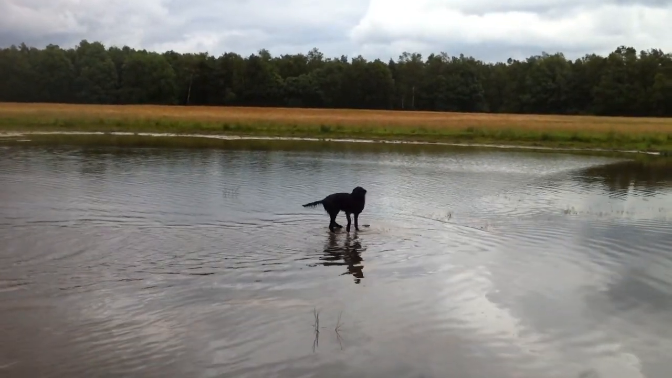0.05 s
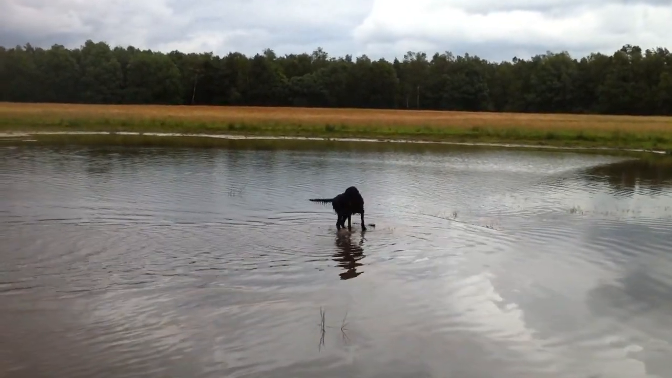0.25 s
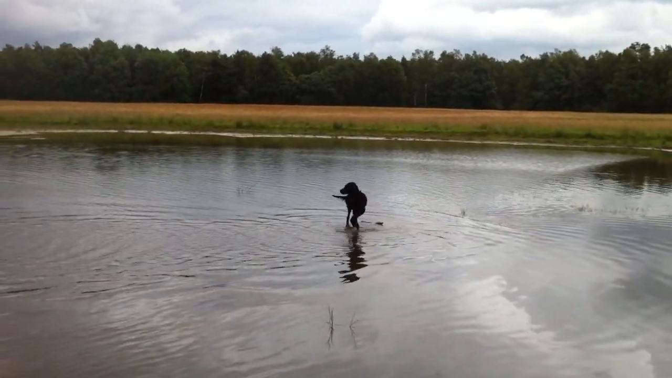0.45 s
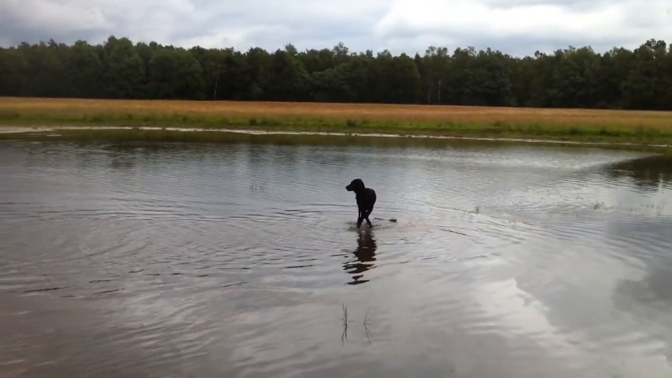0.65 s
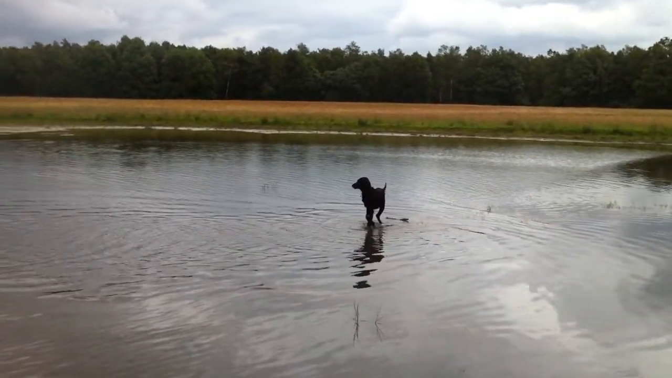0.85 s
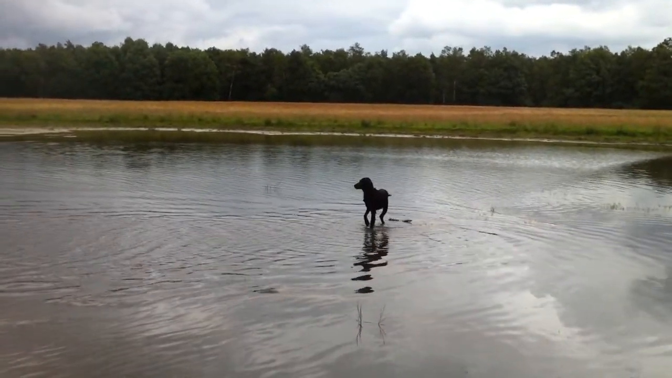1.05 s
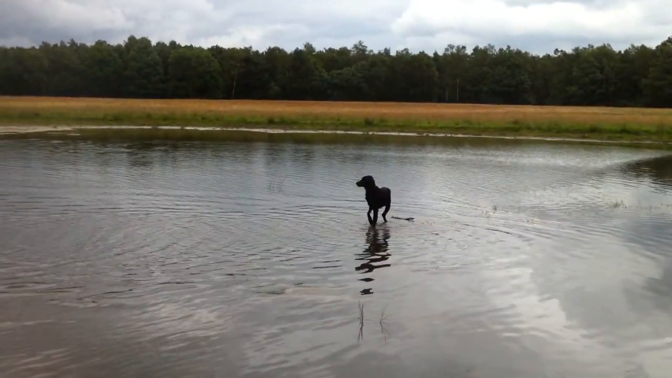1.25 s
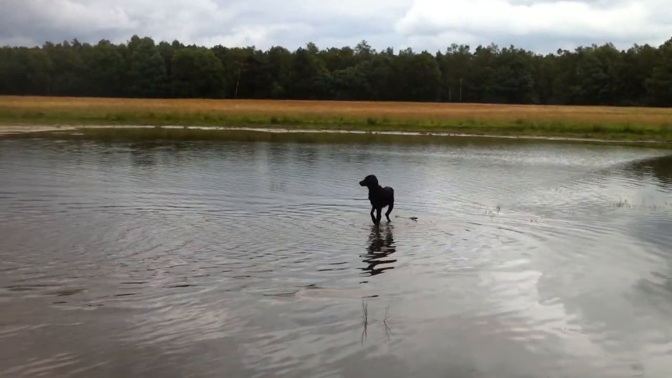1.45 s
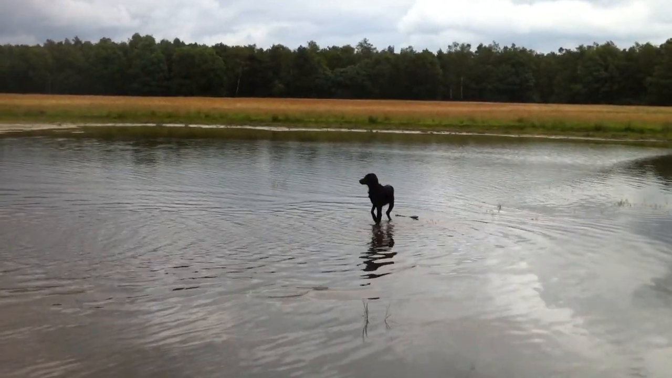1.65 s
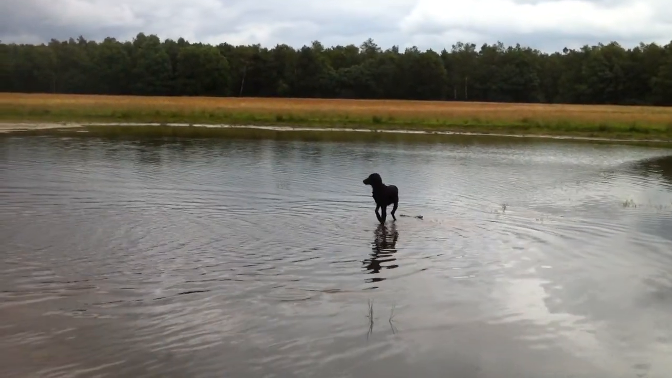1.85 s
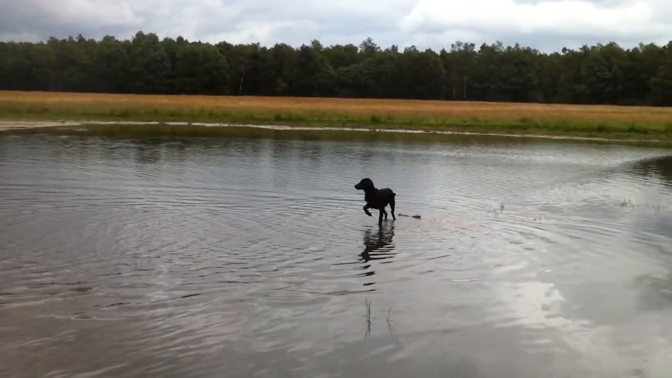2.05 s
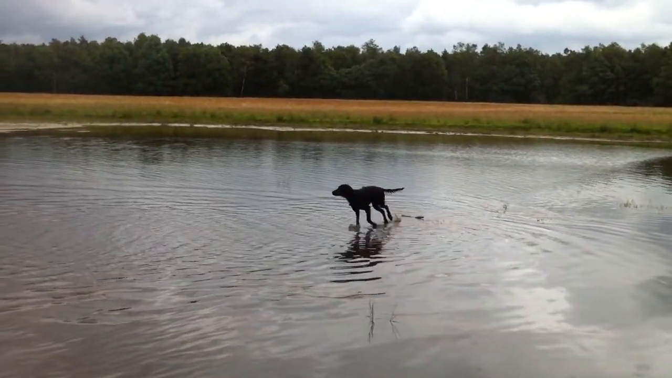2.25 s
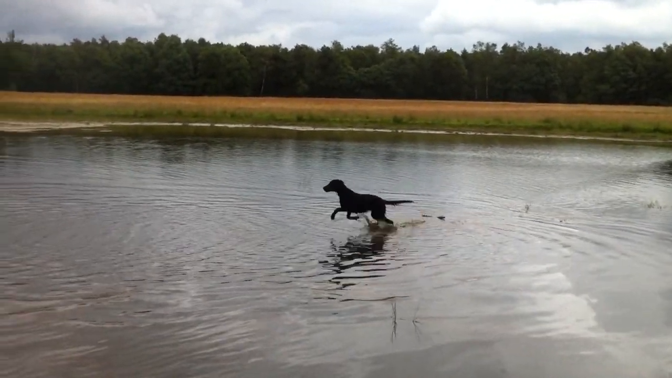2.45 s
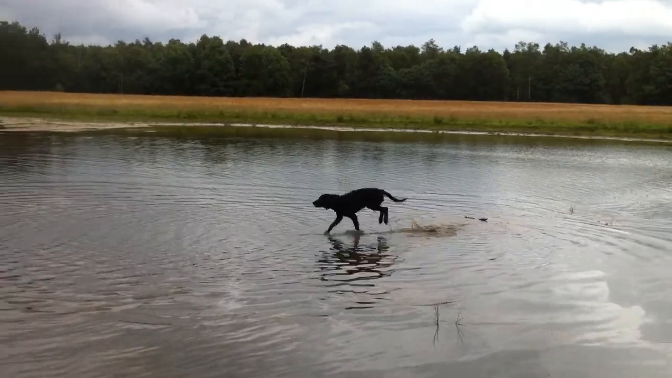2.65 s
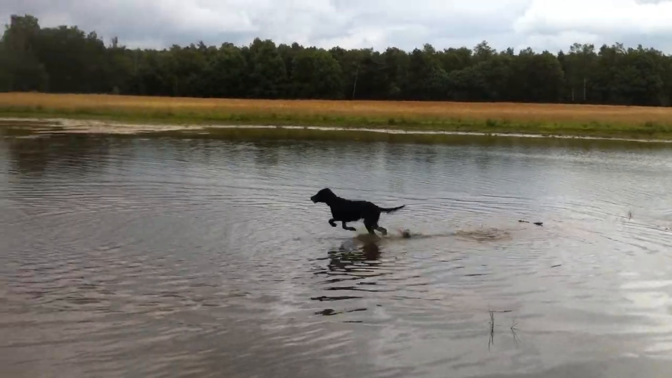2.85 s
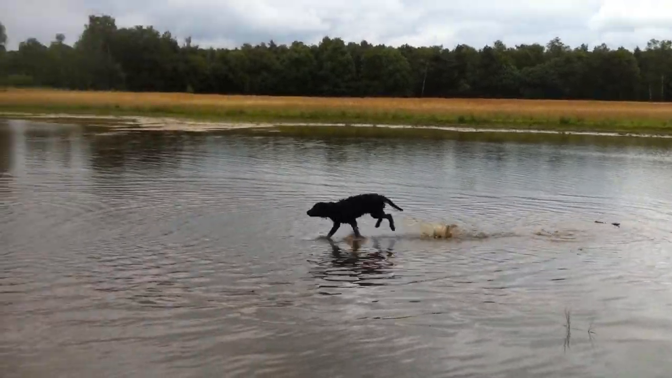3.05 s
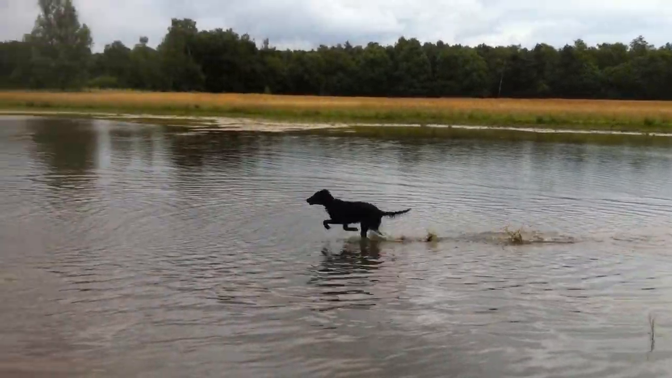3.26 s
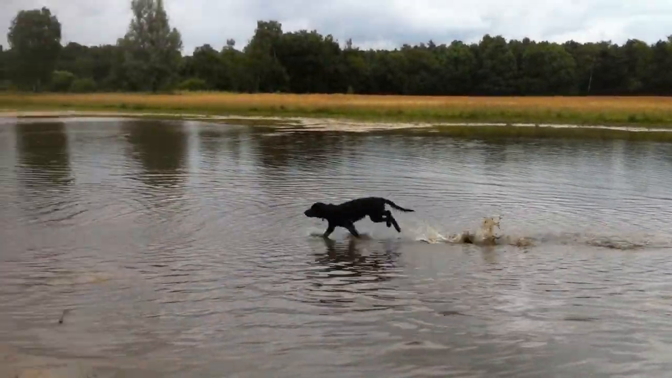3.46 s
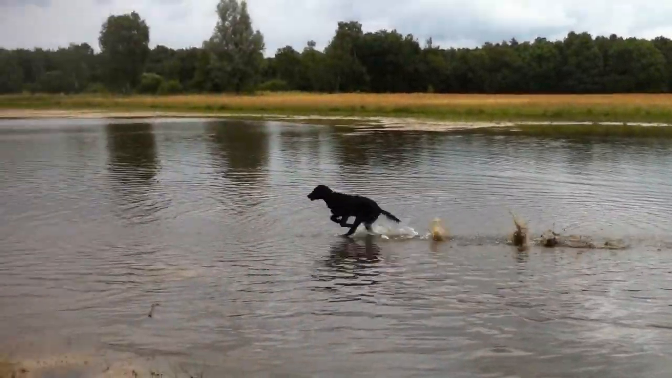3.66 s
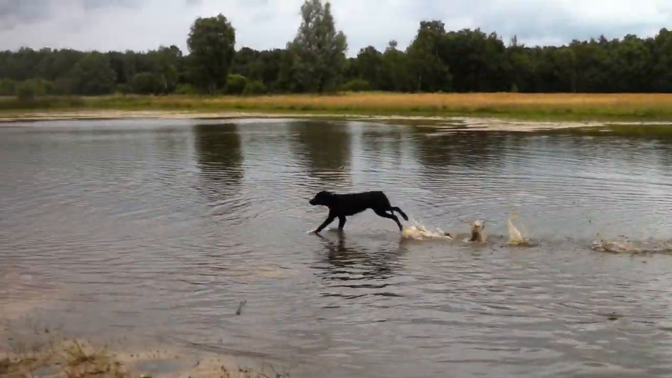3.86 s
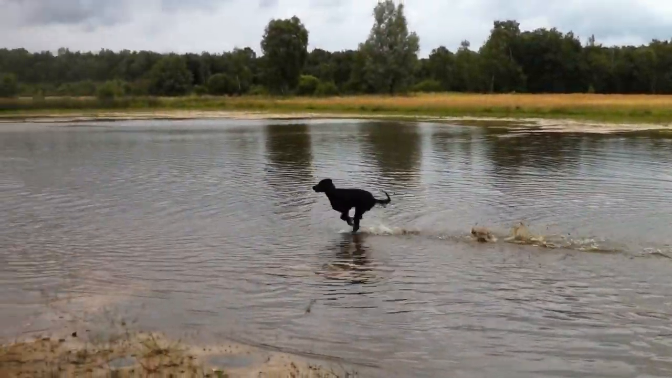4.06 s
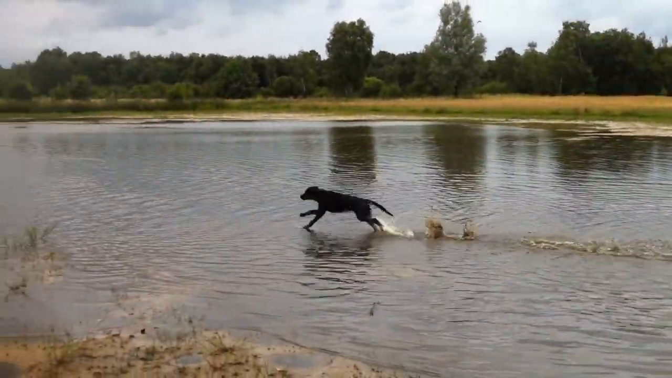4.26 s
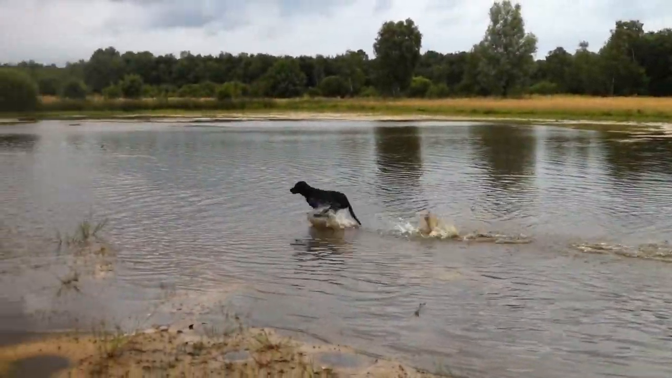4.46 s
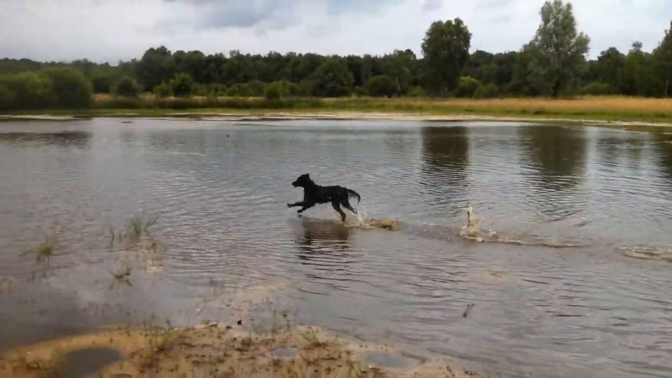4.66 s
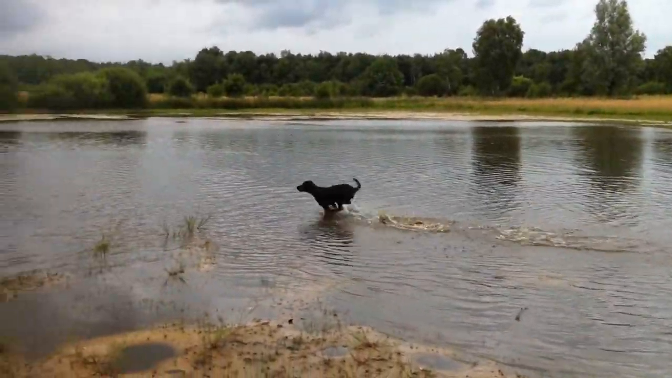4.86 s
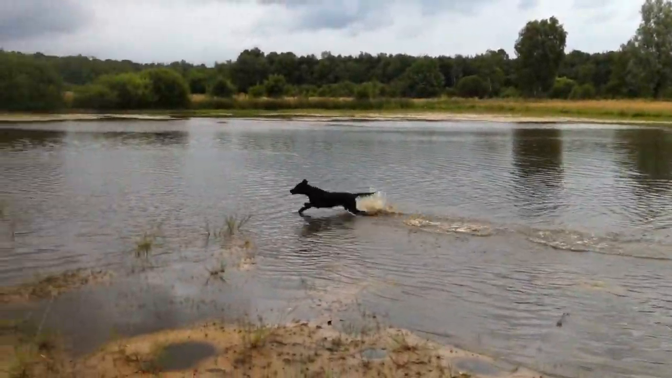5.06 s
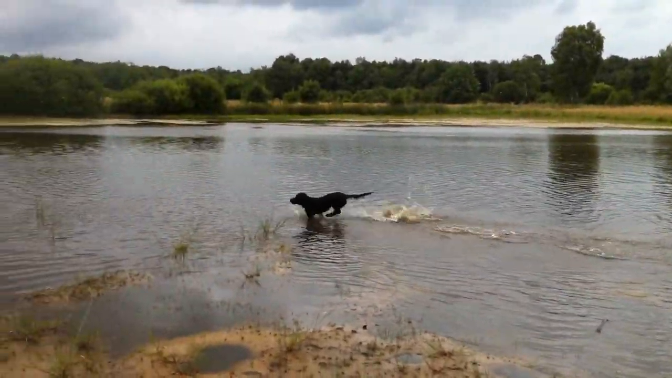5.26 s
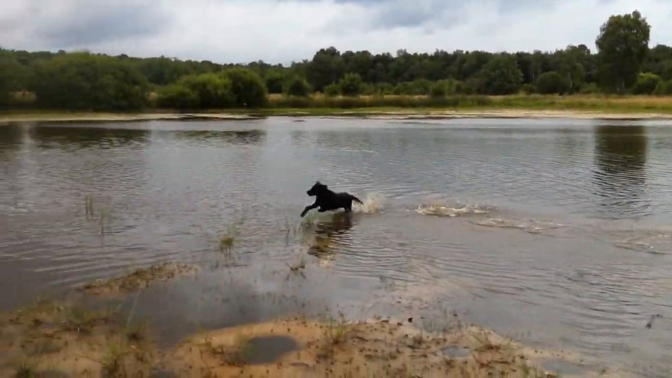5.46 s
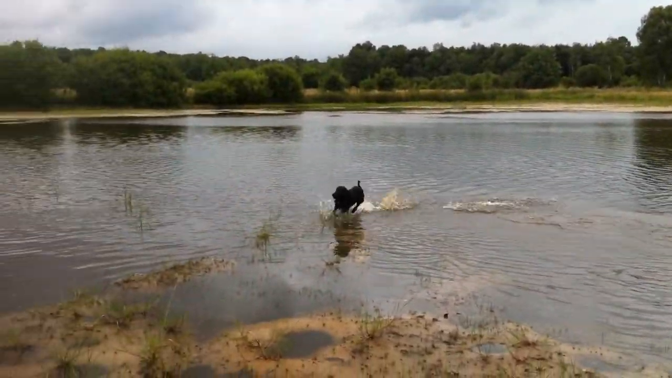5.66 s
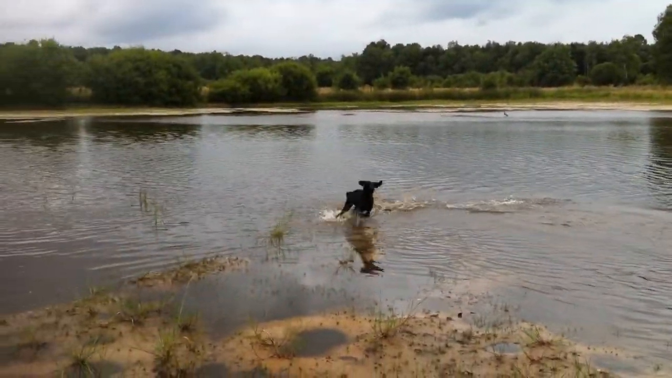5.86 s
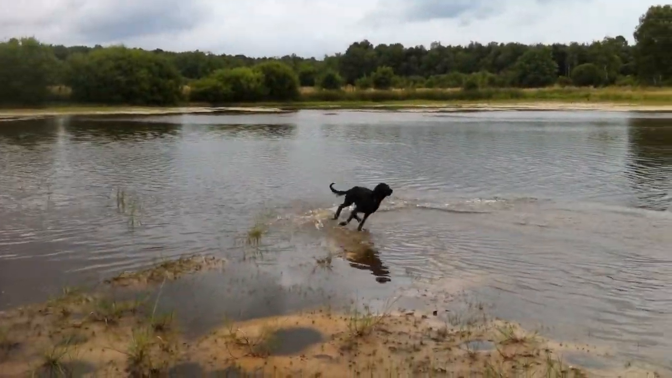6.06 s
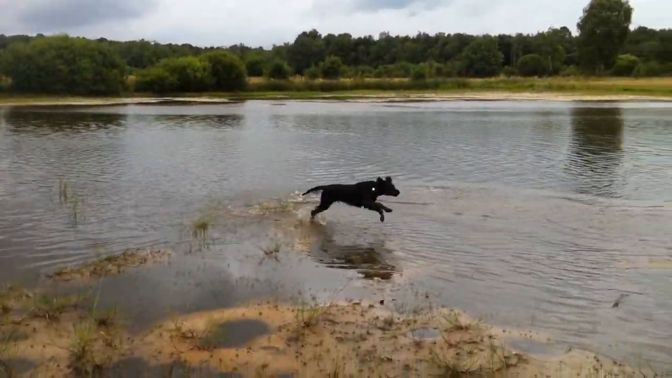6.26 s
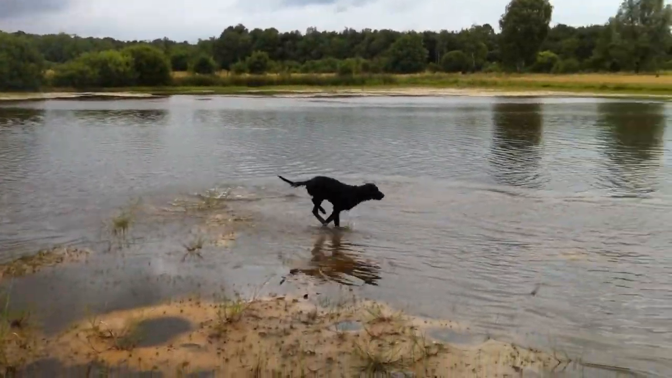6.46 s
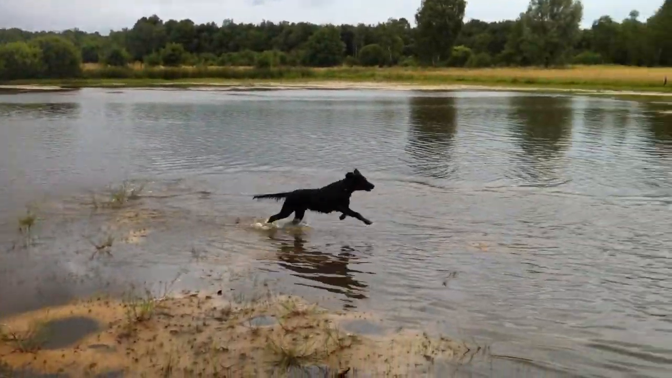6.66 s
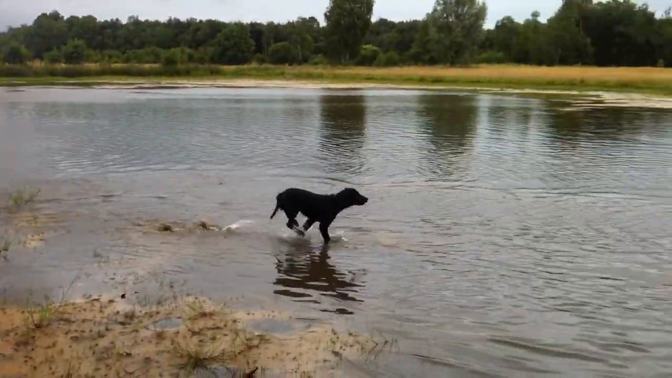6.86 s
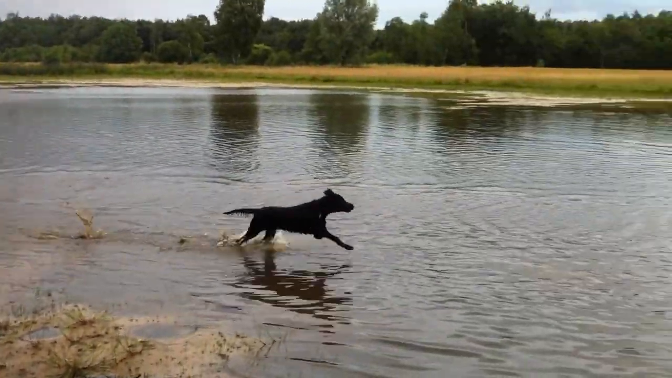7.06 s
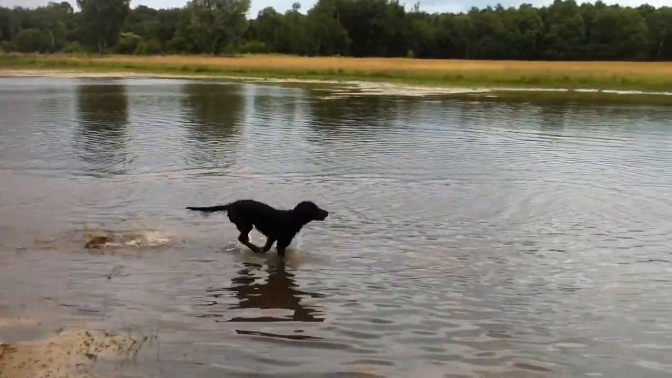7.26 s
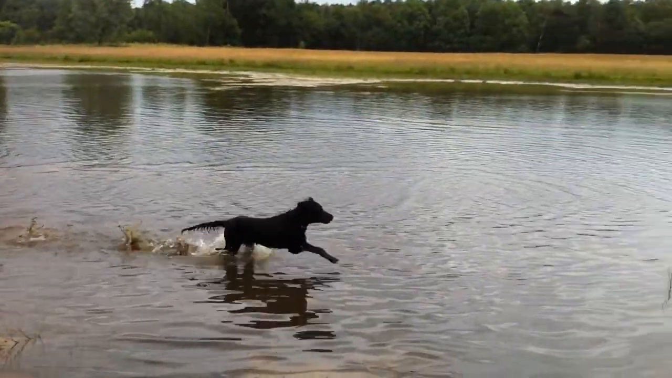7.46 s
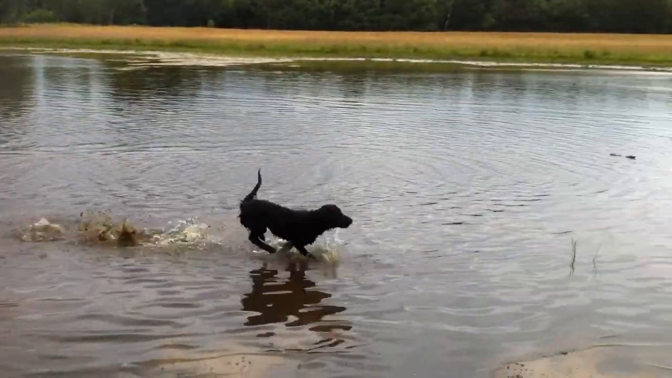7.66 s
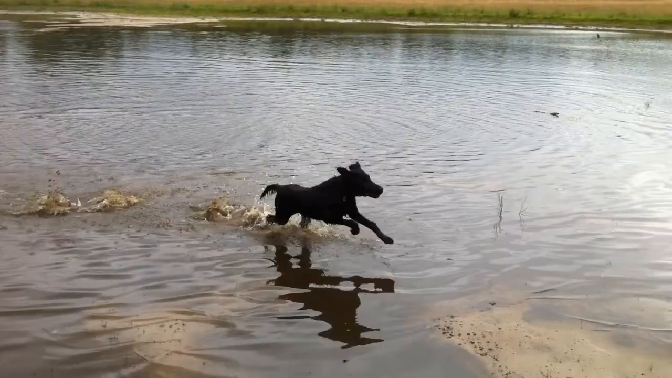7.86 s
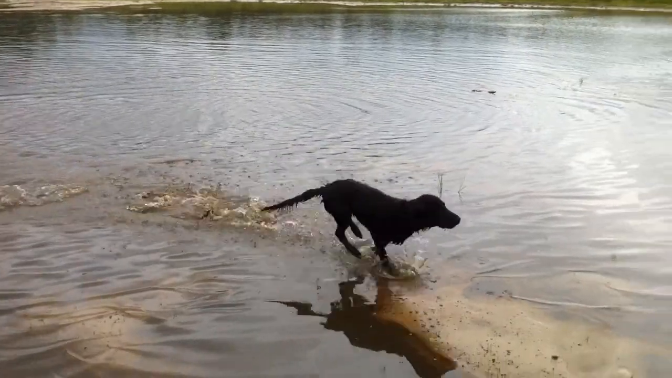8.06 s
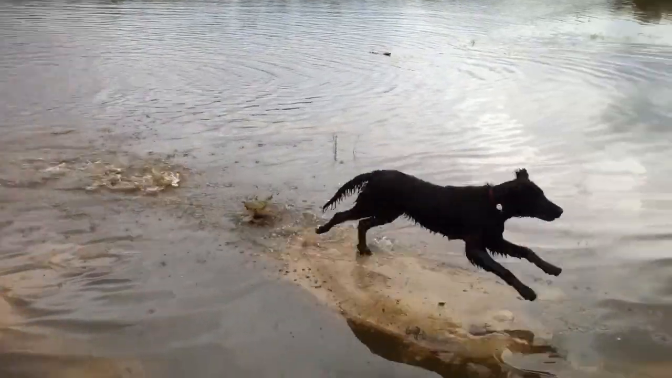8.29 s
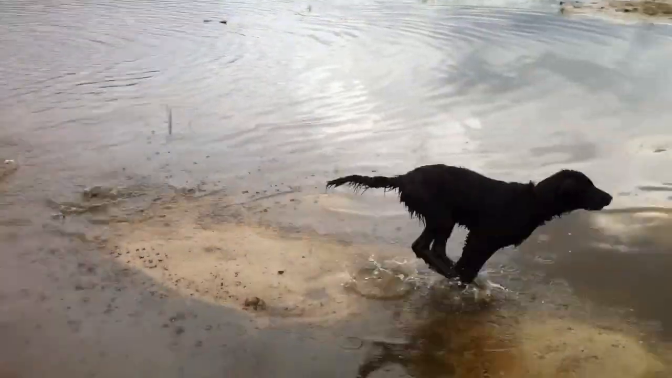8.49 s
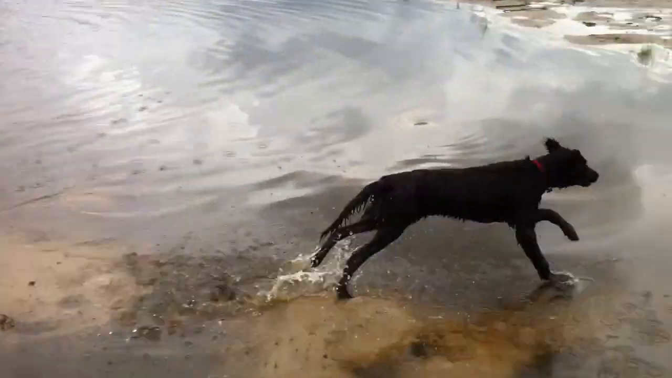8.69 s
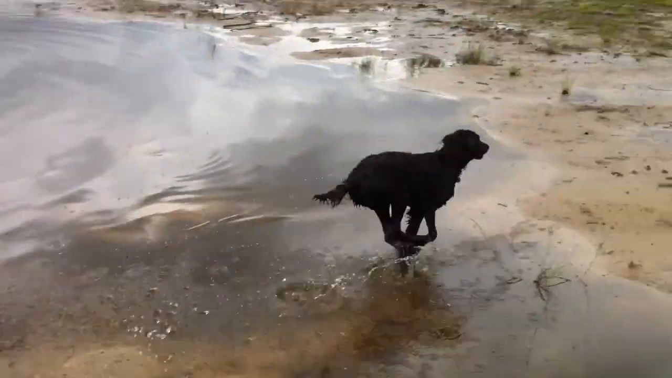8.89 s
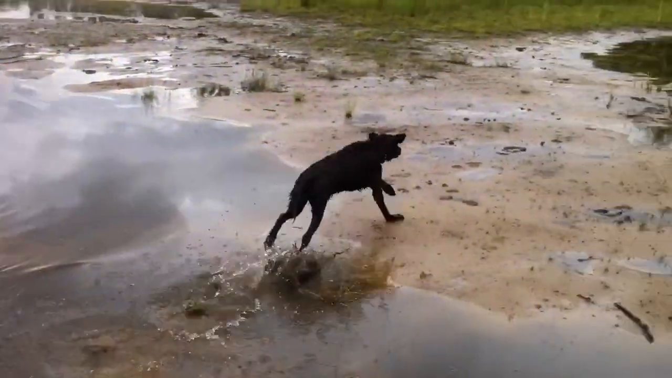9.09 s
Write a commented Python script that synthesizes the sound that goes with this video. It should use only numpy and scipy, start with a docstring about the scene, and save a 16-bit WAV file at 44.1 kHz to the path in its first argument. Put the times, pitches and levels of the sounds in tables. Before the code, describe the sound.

A dog shuffles in shallow water, pauses, then gallops splashing through the pond toward the microphone, ending loud with low wind buffeting over faint hiss.

```python
"""Over a steady hiss of trees and air, coloured noise, a dog turns in a shallow meadow pond, then stands.
It then gallops through and comes close: swarms of decaying sines bubble, and random clicks make spray.
Paws slap the surface as short noise bursts, and trapped air plops as sines that climb in pitch.
At the end wind buffets the microphone: low-pitched noise in gusts, and single pressure knocks."""
import sys
import numpy as np
from scipy import signal
from scipy.fft import rfft, irfft
from scipy.io import wavfile

SR = 44100
rng = np.random.default_rng(int(sys.argv[2]) if len(sys.argv) > 2 else 0)


def transcribe(signal):
    """Save signal, clipped to [-1, 1], as a 16-bit WAV file at the path in sys.argv[1]."""
    frames = np.atleast_2d(signal).T
    limited = np.clip(frames, -1, 1)
    pcm = np.round(limited * 32767).astype(np.int16)
    wavfile.write(sys.argv[1], SR, pcm)


N = 402633   # length in samples


def from_db(db):
    """Logarithmic level: the amplitude gain of a level in dB."""
    return 10 ** (np.asarray(db) / 20)


def rms_one(x):
    """Normalisation of power: the signal scaled to rms 1."""
    return x / np.sqrt(np.mean(x ** 2) + 1e-20)


def in_time(rows):
    """Linear interpolation: each column of a curve, sample by sample."""
    s, *columns = np.transpose(rows)
    return [np.interp(np.arange(N) / SR, s, column) for column in columns]


def at_hz(points, hz):
    """Logarithmic frequency scale: a spectrum in dB, read at these frequencies."""
    known_hz, known_db = np.array(points).T
    return np.interp(np.log(hz), np.log(known_hz), known_db)


def colour(x, spectrum, size=8192):
    """Minimum-phase filtering: the folded cepstrum gives a causal response with this spectrum."""
    hz = np.maximum(np.arange(size // 2 + 1) * SR / size, 1)
    cepstrum = irfft(np.log(from_db(at_hz(spectrum, hz))))
    cepstrum[1:size // 2] *= 2
    cepstrum[size // 2 + 1:] = 0
    response = irfft(np.exp(rfft(cepstrum)))
    return signal.fftconvolve(x, response)[:N]


SPLIT_HZ = 5200


def split(x):
    """Band division: the parts below and above the border between bubbles and spray."""
    filters = [signal.butter(4, SPLIT_HZ, kind, fs=SR, output="sos") for kind in ("low", "high")]
    return [signal.sosfilt(sos, x) for sos in filters]


def drift(rate):
    """Low-passed chance: noise through two equal poles at rate Hz, with spread 1."""
    r = np.exp(-80 * np.pi * rate / SR)   # worked out at every 40th sample
    noise = rng.standard_normal(N // 40 + 2002)
    slow = signal.lfilter([1], [1, -2 * r, r * r], noise)[2000:]
    return np.interp(np.arange(N) / 40, np.arange(len(slow)), rms_one(slow))


def place(s, grains):
    """Superposition: each row of grains is added to the time line at its second."""
    at = np.round(np.asarray(s) * SR).astype(int)[:, None] + np.arange(grains.shape[1])
    return np.bincount(at.ravel(), grains.ravel(), N + grains.shape[1] + SR)[:N]


def bubbles(s, peak_db, hz, cycles, rise, size):
    """Bubble resonance: sines swell to a peak at s and die; positive rise climbs as toward the surface."""
    swell = np.clip(cycles, .5, 12) / hz / 2.45      # the half-height width is 2.45 swell times
    age = np.arange(size) / SR / swell[:, None]
    turns = (hz * swell)[:, None] * (age + rise * (age ** 2 / 2 - age))
    shape = from_db(peak_db)[:, None] * age * np.exp(1 - age)
    return place(np.maximum(s - swell, 0), shape * np.sin(2 * np.pi * turns))


def clicks(per_s, spread_db):
    """Poisson impulses: impacts at random moments, a few bigger than the rest."""
    sizes = from_db(spread_db * np.minimum(rng.exponential(1, N), 4)) * rng.choice([-1, 1], N)
    return sizes * (rng.random(N) < per_s / SR)


# Spectrum of foliage and hiss. Each row: frequency in Hz, relative density in dB per Hz.
AIR_SPECTRUM = [(15, -88), (25, -20), (53, -22), (105, -21.5), (176, -6.5), (338, -8), (443, -10.5),
                (741, -12), (1630, -13.5), (10600, -32), (15000, -31), (16300, -29)]
AIR_DB = -61.5   # mean level


def air():
    """Stationary broadband noise: far foliage and microphone hiss, barely moving."""
    noise = colour(rng.standard_normal(N), AIR_SPECTRUM)
    return from_db(AIR_DB + 0.4 * drift(2.0)) * rms_one(noise)


def drops(per_s, hiss):
    """Shot noise: separate impacts over the blur of the many too small to count."""
    return rms_one(clicks(per_s, spread_db=1.0)) + hiss * rng.standard_normal(N)


def spatter(per_s, t60):
    """Exponential decay: a gain that jumps when a handful of drops lands and then falls away."""
    r = from_db(-60 / (t60 * SR))
    return 1.5 + 1.3 * signal.lfilter([1], [1, -r], abs(clicks(per_s, spread_db=1.0)))


THROW_RISE_S, BUBBLE_T60_S, SPRAY_T60_S = 0.02, 0.13, 0.22   # rise time constant, then 60 dB decay times


def thrown(level_db, t60):
    """Addition of powers: the gain of water each slap throws, which builds quickly and rains back."""
    power = place(np.transpose(SLAPS)[0], from_db(2 * level_db)[:, None])
    for r in np.exp(-1 / (THROW_RISE_S * SR)), from_db(-120 / (t60 * SR)):
        power = signal.lfilter([1], [1, -r], power + 1e-18)
    return np.sqrt(power / (THROW_RISE_S * SR))


FAMILY, FAMILY_S = 3, .03   # small bubbles come in families: members, span in seconds
FAMILY_PITCH_DB = 3         # whole spread of pitch in a family, as a frequency ratio in dB
SPRAY_DB, SPRAY_FOLLOWS = -2, 0.73   # spray in the throw: offset in dB, share of the slap's treble
# Water as the microphone colours it. Each row: frequency in Hz, relative density in dB per Hz.
SPLASH_SPECTRUM = [(150, -38.5), (250, -18.5), (292, -15.5), (421, -27), (607, -11.5), (1100, -13),
                   (1790, -7), (2320, -5), (4820, -18.5), (5540, -28.5), (9170, -30), (10700, -27.5),
                   (14900, -36.5), (16000, -42)]
# Water kept moving between footfalls, in two stretches: as the dog turns, then as it runs.
# Each row: time in seconds, bubbling level in dB, spray level in dB.
CHURN = [
    [(0.0, -64, -73), (0.146, -65, -74), (1.25, -74, -86)],
    [(2.3, -64.5, -80), (2.91, -59, -61.5), (3.35, -49.5, -64), (3.63, -49, -58.5), (4.81, -45, -56.5),
     (5.17, -48, -60.5), (5.84, -49.5, -58), (6.1, -52, -59), (6.31, -61, -64), (6.75, -63, -65),
     (7.03, -54.5, -100), (7.32, -49.5, -59), (8.14, -43, -52), (8.46, -49.5, -55), (8.63, -51, -52.5),
     (8.77, -49.5, -52), (9.13, -57, -56.5)],
]


def churn(count=3400):
    """Incoherent sum of many sources: swarms of small bubbles, a wash of falling drops, and fine spray."""
    bubbling_db, spray_db = in_time(sum(CHURN, []))
    born, pitch = np.repeat(rng.random((count, 2)), FAMILY, axis=0).T      # kin are close in time and size
    late, detune, loud, ring, climb = rng.random((count * FAMILY, 5)).T
    hz = 330 * from_db(24 * pitch ** .8 + FAMILY_PITCH_DB * (detune - .5))
    peak_db = at_hz(SPLASH_SPECTRUM, hz) + 4 * pitch - 2.16 * np.log(loud + 0.022)
    cycles = 1.94 + (3.2 + 8.5 * pitch) * ring ** 2
    rise = 0.09 * (climb[:, None] - .25)      # most climb in pitch, some fall
    swarm = rms_one(bubbles(born * N / SR + FAMILY_S * late, peak_db, hz, cycles, rise, size=800))

    clumps = from_db(2.0 * drift(32.0))      # drops land in bunches
    wash_drops = clumps * spatter(30, t60=0.03) * drops(1400, hiss=.5)
    wash = split(colour(wash_drops, SPLASH_SPECTRUM))[0]
    spray_drops = clumps * spatter(21, t60=0.076) * drops(790, hiss=1.5)
    spray = split(colour(spray_drops, SPLASH_SPECTRUM))[1]
    water = rms_one(swarm * from_db(2.26 * drift(51)) + 0.9 * rms_one(wash))

    t = np.arange(N) / SR
    moving = (t < CHURN[0][-1][0]) | (t > CHURN[1][0][0])      # calm water while the dog stands
    _, _, treble_db, throw_db = np.transpose(SLAPS)
    thrown_spray_db = throw_db + SPRAY_DB + SPRAY_FOLLOWS * treble_db
    bubbling = np.hypot(moving * from_db(bubbling_db), thrown(throw_db, BUBBLE_T60_S))
    spraying = np.hypot(moving * from_db(spray_db), thrown(thrown_spray_db, SPRAY_T60_S))
    return bubbling * water + spraying * rms_one(spray)


CLIMB_PER_CYCLE = 0.005   # long-ringing pockets climb further in pitch
# Each pocket sheds two others: spread of delay in seconds, level in dB, spread of pitch as a ratio in dB.
BREAKUP_S, BREAKUP_DB, BREAKUP_PITCH_DB = .012, -14, 2.5
# Larger air pockets trapped by paws and falling water, low ones deep.
# Each row: time of the peak in seconds, level in dB, pitch at the peak in Hz, length in cycles (12 at most).
POCKETS = [(0.004, -48, 1020, 5.9), (0.084, -54, 2570, 9.9), (0.186, -44, 2010, 4.5),
           (0.192, -46.5, 1620, 6.1), (0.199, -48, 1750, 8), (0.314, -52, 2220, 8), (0.449, -50, 1032, 4.2),
           (0.465, -52, 1800, 11), (0.476, -43.5, 2250, 5.9), (0.482, -45, 2250, 6.5),
           (0.722, -53, 1700, 9), (0.765, -50, 900, 4.8), (0.775, -51, 575, 4.8), (0.79, -54, 1690, 27),
           (0.813, -49, 1620, 6.3), (0.866, -50, 1430, 5.5), (0.899, -49, 810, 17), (1.073, -45, 2430, 1.9),
           (2.435, -46, 1670, 9.4), (2.443, -40, 2300, 3.7), (2.49, -50, 1400, 3.3),
           (2.563, -36.5, 1550, 7.3), (2.586, -40, 1940, 8), (2.707, -40, 1670, 11),
           (2.731, -36.5, 2480, 5.6), (2.846, -32, 2200, 1.9), (2.869, -32, 1860, 4.3),
           (2.976, -30, 1100, 2.5), (2.98, -33.5, 605, 5.5), (3.134, -33, 3380, 7.8),
           (3.193, -38, 2160, 3.7), (3.294, -39, 1280, 9), (3.355, -40, 1890, 9.5), (3.352, -40, 1140, 3.3),
           (3.372, -55, 780, 5.7), (3.401, -43.5, 560, 6.7), (3.425, -37, 1000, 4.2),
           (3.401, -33, 1480, 4.1), (3.435, -30, 1720, 4.9), (3.558, -36, 1720, 6.3),
           (3.628, -37, 368, 1.7), (3.714, -35, 1780, 4.9), (3.712, -33.5, 550, 1.6),
           (3.754, -32, 2340, 1.9), (3.832, -39.5, 594, 3.6), (3.855, -30.5, 1790, 9.9),
           (4.148, -46, 323, 2.7), (4.249, -37, 1870, 4.9), (4.28, -35, 2560, 4.7), (4.284, -42, 700, 5.1),
           (4.378, -41.5, 370, 2), (4.41, -38.5, 590, 3.3), (4.4345, -36, 2000, 2.3),
           (4.472, -24, 3550, 2.6), (4.498, -38, 486, 5.9), (4.499, -35.5, 260, 2.1),
           (4.505, -41, 190, 2.4), (4.635, -43.5, 286, 2.6), (4.747, -43.5, 330, 2.3),
           (5.012, -35, 710, 1.8), (5.022, -33, 760, 3.4), (5.047, -32, 2770, 6.2), (5.05, -30, 650, 2.6),
           (5.079, -36.5, 454, 2.4), (5.102, -32, 685, 2.5), (5.111, -34, 770, 1.2),
           (5.319, -35.5, 640, 3.3), (5.422, -37, 2070, 3.3), (5.455, -46.5, 336, 7.4),
           (5.498, -37, 520, 1.3), (5.512, -44, 229, 2.2), (5.641, -27, 710, 1.15), (5.671, -36, 1470, 5.6),
           (5.686, -35, 1410, 6), (5.706, -34, 1540, 4.6), (5.884, -29, 2280, 2.7), (5.942, -35, 2500, 7.4),
           (5.978, -46, 750, 0.95), (6.259, -23, 2320, 2.9), (6.261, -41, 630, 2.7),
           (6.323, -47.5, 590, 3.8), (6.546, -49.5, 480, 9.1), (6.71, -36, 1100, 5.7),
           (6.753, -39.5, 585, 2.1), (6.772, -38, 810, 5.6), (6.782, -37, 1360, 3),
           (6.879, -24, 2980, 2.25), (6.899, -35, 736, 2.1), (6.904, -32, 786, 5.2),
           (7.108, -33.5, 1730, 3.4), (7.117, -41.5, 696, 4.9), (7.178, -36, 1850, 8.5),
           (7.248, -34, 1120, 3.5), (7.254, -29.5, 1920, 2.3), (7.281, -26, 1260, 1.25),
           (7.337, -33, 1790, 2.4), (7.34, -40, 646, 3.06), (7.397, -36, 2100, 8.5),
           (7.496, -33.5, 654, 3.7), (7.513, -33, 1960, 4.9), (7.522, -36, 1920, 5),
           (7.54, -33.5, 1770, 10.5), (7.549, -37.5, 650, 6.4), (7.654, -30, 2780, 5.6),
           (7.656, -31, 670, 1.9), (7.668, -29, 1280, 2.9), (7.718, -38, 635, 4.4), (7.748, -38, 1940, 3.1),
           (7.805, -33.5, 1700, 7.7), (7.884, -39.5, 960, 5.2), (7.91, -34, 1020, 2.7),
           (8.079, -32, 2980, 6.1), (8.119, -30, 1690, 2.9), (8.142, -26, 2180, 4.1),
           (8.154, -30, 1970, 5.7), (8.231, -35, 1980, 4.1), (8.279, -24, 2000, 3.9),
           (8.281, -29.5, 653, 4.4), (8.487, -23.5, 840, 1.06), (8.488, -26, 2059, 5.9),
           (8.546, -27, 2600, 4.4), (8.675, -33, 2310, 5), (8.699, -34.5, 2240, 10.1),
           (8.866, -34, 1530, 3.7), (8.96, -28.5, 2350, 4)]


def pockets():
    """Volume resonance: plops, drips and thumps of trapped air, each breaking up into a small cluster."""
    s, peak_db, hz, cycles = np.repeat(POCKETS, 3, axis=0).T
    late, pitch = rng.standard_normal((len(s), 2)).T
    shed = np.arange(len(s)) % 3 > 0      # the first of each three is the pocket itself
    s = s + shed * BREAKUP_S * abs(late)
    peak_db = peak_db + shed * BREAKUP_DB
    hz = hz * from_db(shed * BREAKUP_PITCH_DB * pitch)
    return bubbles(s, peak_db, hz, cycles, rise=CLIMB_PER_CYCLE * cycles[:, None], size=3000)


SLAP_T60_S = 0.019   # time to fall by 60 dB
SLAP_RISE_S, CRACK_LAG_S = .0004, .001   # the sheet lands over a moment, the bright crack last
SMACK, SMACK_S = 0.74, 0.00017   # the first contact: extra height, moment of its top in seconds
# A paw or sheet of water slaps the surface and throws water up. Each row: start in seconds,
# burst level in dB, treble relative to it in dB, thrown water in dB; later gains apply to body and crack.
SLAPS = [(0.2917, -33, -17, -56), (0.317, -32, -20, -62), (0.4474, -30.5, -38, -65),
         (0.7387, -35, -10, -58), (0.7808, -31, -36, -56), (0.804, -36, -25, -64), (0.8644, -35, -21, -60),
         (0.891, -33, -26, -69), (1.072, -49, -33, -64), (2.37, -36, -6, -64), (2.3754, -24.5, -23, -51),
         (2.3855, -37, -17, -52), (2.4286, -29.5, -24, -48.5), (2.5285, -30, -3, -50),
         (2.558, -17, -17, -43), (2.705, -52, -13, -43), (2.746, -29, -15, -48), (2.7803, -22, -31, -47),
         (2.8278, -25, -10, -45.5), (2.8665, -22.5, -30, -46.5), (2.925, -23, -22, -47),
         (2.9598, -22, -25, -45), (2.9758, -15.5, -26, -40), (2.9814, -22.5, -7, -59),
         (3.106, -46, -21, -63), (3.133, -20, -11.5, -45), (3.1918, -26, -15, -46),
         (3.2124, -19, -14.5, -54), (3.239, -28, -15, -50), (3.3395, -18, -16, -36.5),
         (3.4014, -24.5, -8.5, -45), (3.4334, -17.5, -23, -62), (3.5155, -14, -17.5, -40.5),
         (3.556, -19, -19, -37), (3.6071, -15, -15, -36.5), (3.6139, -16.5, -20, -50),
         (3.627, -19, -28, -54), (3.7103, -15.5, -20.5, -43.5), (3.752, -34.5, -1, -47.5),
         (3.8275, -23.5, -15, -40), (3.8525, -29, -36, -46), (3.991, -17.5, -16.5, -39.5),
         (4.027, -12.5, -23, -39.5), (4.1997, -21, -12.5, -35), (4.2354, -31, -24, -50.5),
         (4.279, -29, -4, -64), (4.3952, -21, -18, -39.5), (4.4327, -14.5, -19, -44),
         (4.469, -15, -18, -43), (4.632, -24, -12.5, -38), (4.8442, -30, -4.5, -49), (4.878, -28, -7, -42),
         (5.045, -16.5, -14.5, -38), (5.2306, -19, -21.5, -43.5), (5.2865, -31, -27, -39),
         (5.311, -16, -20.5, -60), (5.4202, -25, -35, -42.5), (5.4529, -22.5, -11.5, -38.5),
         (5.657, -23, -21, -33), (5.704, -45, -31, -54), (5.725, -16.5, -18, -41.5),
         (5.8829, -16.5, -14.5, -38.5), (5.941, -22.5, -14, -45), (6.1298, -20, -17, -41.5),
         (6.161, -26.5, -9.5, -52), (6.2568, -29, -13, -47.5), (6.318, -18.5, -13.5, -54),
         (6.4736, -20.5, -15.5, -47.5), (6.5193, -21, -10.5, -44.5), (6.66, -25.5, -26, -50),
         (6.6895, -23, -10.5, -45), (6.7073, -21, -15, -58), (6.749, -18, -17, -40),
         (6.878, -20.5, -11, -39.5), (6.9625, -21.5, -11, -37), (7.005, -36, 3.5, -48.5),
         (7.068, -29, -6, -39), (7.104, -38, -23, -39), (7.1478, -20.5, -12, -42),
         (7.2515, -12, -17, -38.5), (7.2795, -32, -30, -41), (7.3347, -18, -12.5, -40.5),
         (7.3953, -41, -18, -37), (7.449, -26, -8, -54), (7.473, -21.5, -9, -35), (7.511, -51, -7, -39.5),
         (7.6526, -14, -13.5, -34), (7.7261, -8.5, -20.5, -39), (7.747, -21, -16, -55),
         (7.7944, -24, -41, -43), (7.8792, -25.5, -3, -35), (7.954, -18, -8, -41), (8.076, -21, -11, -36.5),
         (8.1397, -18, -5, -56), (8.2008, -51, -1, -35.5), (8.276, -18.5, -4.5, -40),
         (8.3446, -14, -12.5, -57), (8.4855, -9, -15.5, -59), (8.5448, -16.5, -9.5, -41.5),
         (8.673, -29, -1.5, -37), (8.7336, -19.5, -3, -49), (8.816, -16, -37, -62),
         (8.8477, -13.5, -14.5, -44), (8.9289, -10, -14.5, -49), (8.958, -56, 15.5, -58),
         (9.0638, -19, -14.5, -39)]


def slaps(size=2200):
    """Impact noise: a burst that builds in a moment and dies fast, with a body and a bright crack."""
    s, peak_db, treble_db, _ = np.transpose(SLAPS)
    t = np.arange(size) / SR
    fall = from_db(peak_db)[:, None] * (1 - np.exp(-t / SLAP_RISE_S)) * from_db(-60 * t / SLAP_T60_S)
    contact = 1 + SMACK * t / SMACK_S * np.exp(1 - t / SMACK_S)
    burst = fall * rng.standard_normal((len(s), size)) * contact
    bright_burst = burst * from_db(treble_db)[:, None]
    body = split(colour(place(s, burst), SPLASH_SPECTRUM))[0]
    crack = split(colour(place(s + CRACK_LAG_S, bright_burst), SPLASH_SPECTRUM))[1]
    return from_db(1.5) * body + from_db(26.5) * crack


GUST_RISE_DB_PER_S, GUST_FALL_DB_PER_S = 900, 904
# The breeze between the gusts. Each row: time in seconds, rumble level in dB ahead of the port.
BREEZE = [(6.7, -72), (7.3, -58.5), (9.13, -57.5)]
# Gusts on the microphone. Each row: start in seconds, length in seconds, rumble level in dB ahead of the port.
GUSTS = [(7.037, 0.071, -56), (7.328, 0.33, -57.5), (7.588, 0.052, -52), (7.817, 0.073, -38),
         (7.971, 0.29, -40.5), (8.169, 0.32, -34.5), (8.671, 0.061, -35), (8.748, 0.11, -30),
         (8.915, 0.0045, -20.5), (8.986, 0.1, -45), (9.076, 0.028, -21.5), (9.1, 0.061, -27)]


def gusting():
    """Level envelope in dB: each gust sets in, holds and drops away to the breeze."""
    t = np.arange(N) / SR
    level_db, = in_time(BREEZE)
    for start, length, db in GUSTS:
        slopes = np.minimum(GUST_RISE_DB_PER_S * (t - start), GUST_FALL_DB_PER_S * (start + length - t))
        level_db = np.maximum(level_db, db + np.minimum(slopes, 0))
    return level_db


BUFFET_CYCLES, BUFFET_SAG = 1.18, 0.15   # width of a knock; its pitch sags as it dies
# The strongest eddies hit the port singly.
# Each row: time of the peak in seconds, level in dB ahead of the port, ring in Hz.
BUFFETS = [(7.07, -31, 148), (7.373, -35.5, 134), (7.443, -37, 190), (7.496, -35.5, 172),
           (7.605, -33.5, 148), (7.633, -37, 150), (7.65, -33, 147), (7.794, -35, 172), (7.813, -38, 172),
           (7.836, -23, 258), (7.851, -23, 226), (8.044, -27, 230), (8.136, -32, 150), (8.176, -27, 258),
           (8.191, -17.5, 240), (8.217, -27.5, 298), (8.245, -30, 172), (8.268, -29, 224), (8.28, -28, 200),
           (8.297, -23.5, 250), (8.318, -28, 290), (8.342, -41, 200), (8.39, -21, 285), (8.416, -14.5, 210),
           (8.452, -16, 255), (8.473, -36, 180), (8.5, -30, 135), (8.519, -25, 176), (8.537, -25, 168),
           (8.675, -16, 202), (8.707, -16, 235), (8.741, -34, 250), (8.759, -27, 185), (8.783, -18.5, 302),
           (8.796, -20, 314), (8.817, -29, 223), (8.838, -26, 237), (8.848, -32, 211), (8.885, -31, 172),
           (8.913, -43, 184), (8.927, -15.5, 240), (9.035, -25.5, 246), (9.053, -34, 195),
           (9.073, -11, 427), (9.08, -23, 217), (9.089, -2.5, 228), (9.104, -19.5, 358), (9.114, -25, 200)]


def knocks(size=1600):
    """Pressure pulse: each eddy sucks suddenly, peaks at its second and swings back once or twice."""
    s, peak_db, hz = np.transpose(BUFFETS)
    turns = hz[:, None] * (np.arange(size) - size // 2) / SR
    width = np.where(turns < 0, .35, .75) * BUFFET_CYCLES      # steeper before the peak than after
    envelope = np.exp(-abs((turns - .2) / width) ** 2.0)
    push = -envelope * np.cos(2 * np.pi * turns * (1 - BUFFET_SAG * np.tanh(turns)))
    return place(s - size // 2 / SR, from_db(peak_db)[:, None] * push)


# Spectrum of the wind rumble. Each row: frequency in Hz, relative density in dB per Hz.
GUST_SPECTRUM = [(25, -32), (60, -18.5), (123, 1), (186, 1), (301, -6), (452, -17), (900, -32), (1170, -55),
                 (1980, -120)]


def wind():
    """Turbulent pressure: eddies at the port give a lumpy low rumble, the strongest as single knocks."""
    eddies = rms_one(clicks(280, spread_db=2.0)) + .5 * rng.standard_normal(N)
    lumpy = eddies * from_db(1.2 * drift(17))
    rumble = from_db(gusting()) * rms_one(colour(lumpy, GUST_SPECTRUM))
    return rumble + knocks()


PORT_HZ = 102


def scene():
    """Linear superposition: water and wind, less the bass the port vents, over the steady air."""
    near = churn() + pockets() + slaps() + wind()
    port = signal.butter(3, PORT_HZ, "high", fs=SR, output="sos")
    return (signal.sosfilt(port, near) + air())[None]


CUTOFF_HZ = 16500   # 40 dB down from here up


def record(dry):
    """Band limitation: a steep low-pass cuts the top."""
    return signal.sosfilt(signal.cheby2(16, 40, CUTOFF_HZ, fs=SR, output="sos"), dry)


dry = scene()
out = record(dry)
transcribe(out)
```